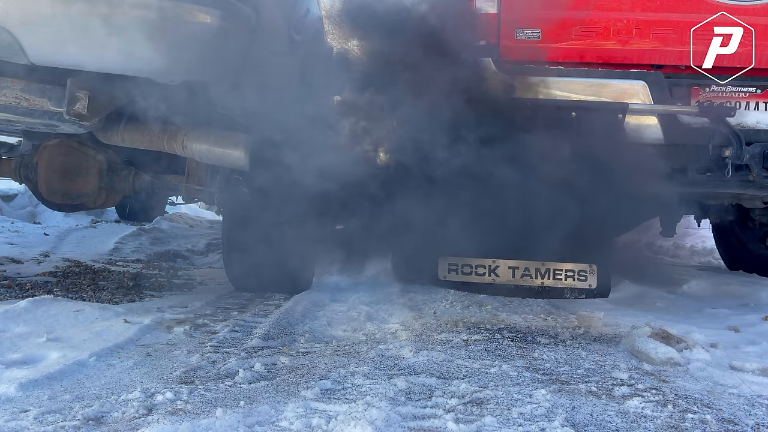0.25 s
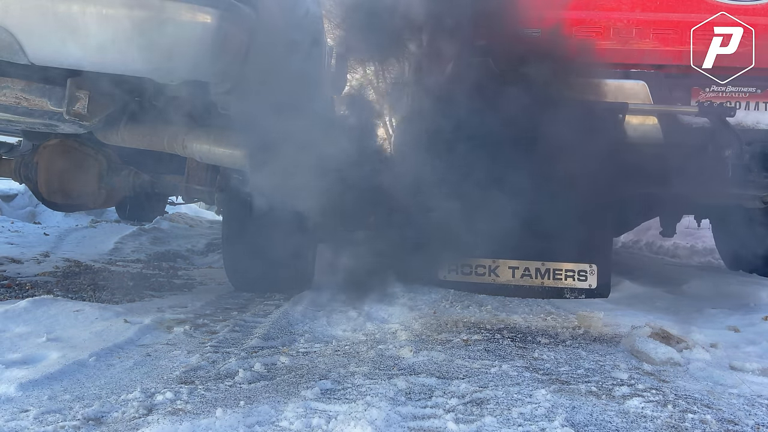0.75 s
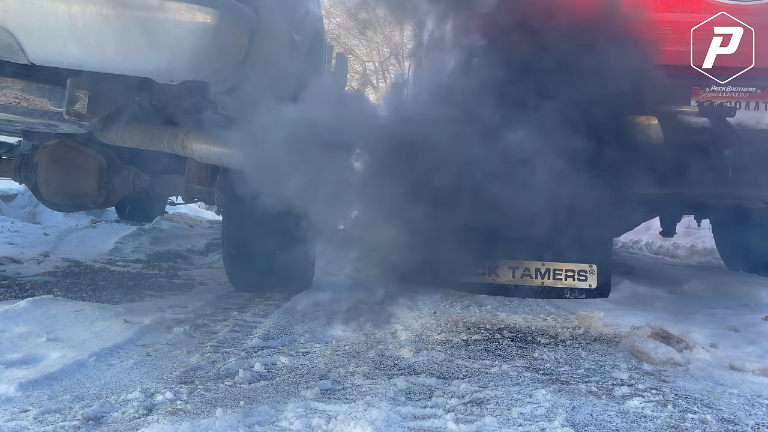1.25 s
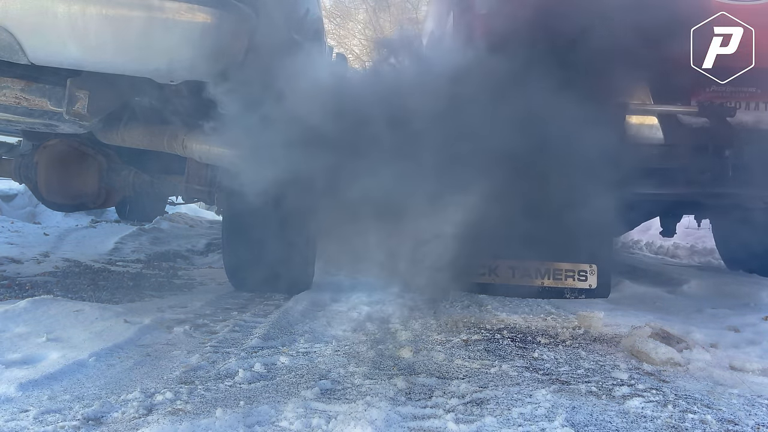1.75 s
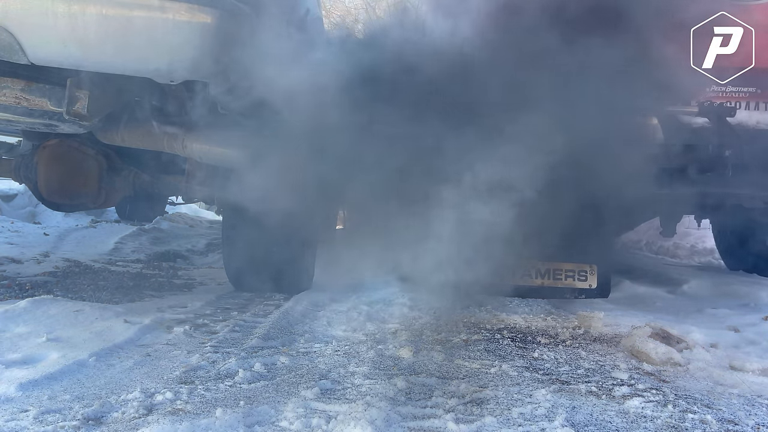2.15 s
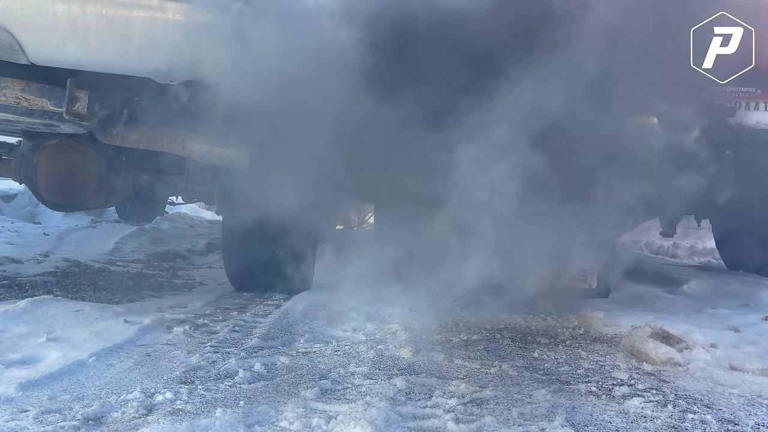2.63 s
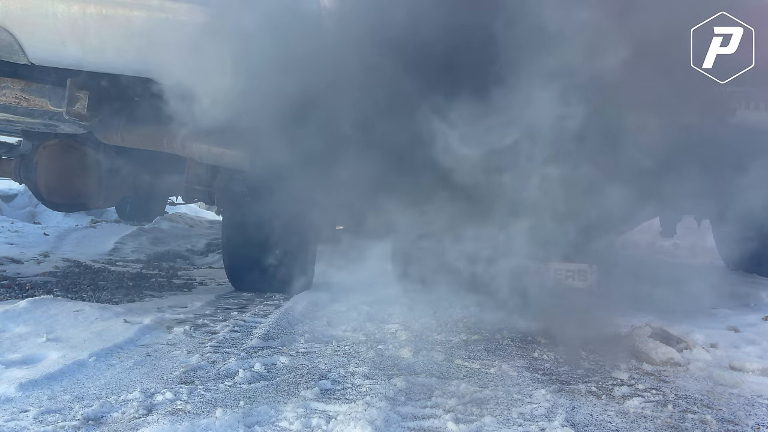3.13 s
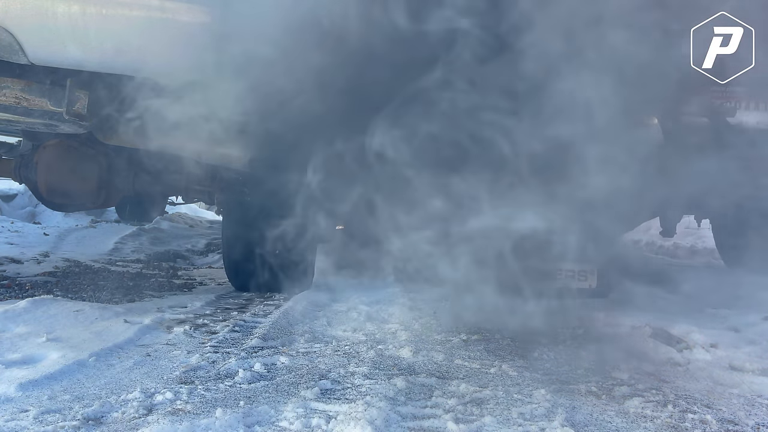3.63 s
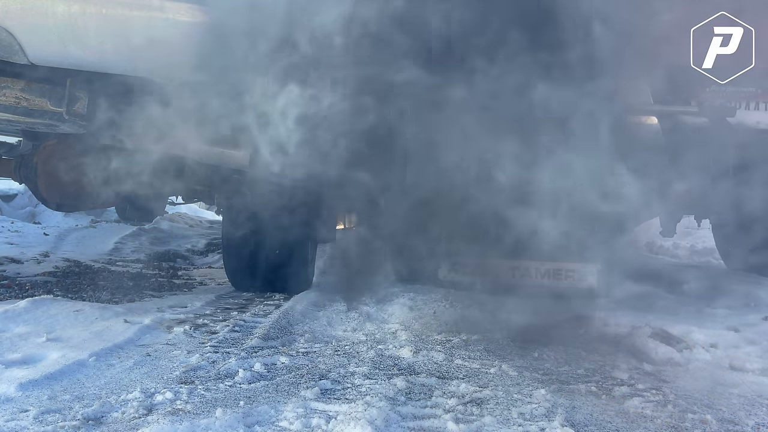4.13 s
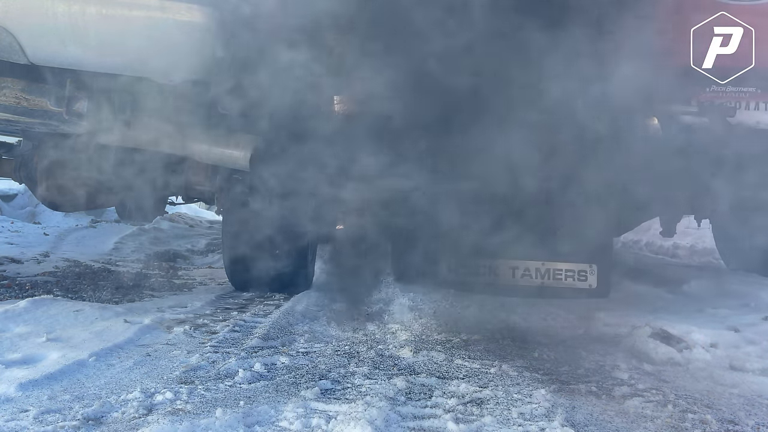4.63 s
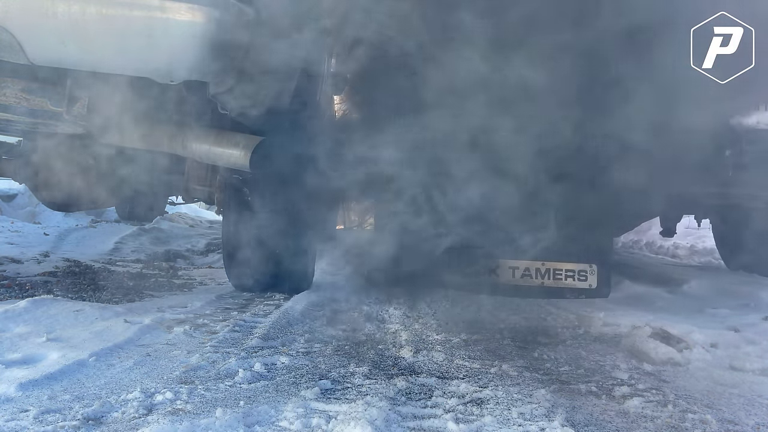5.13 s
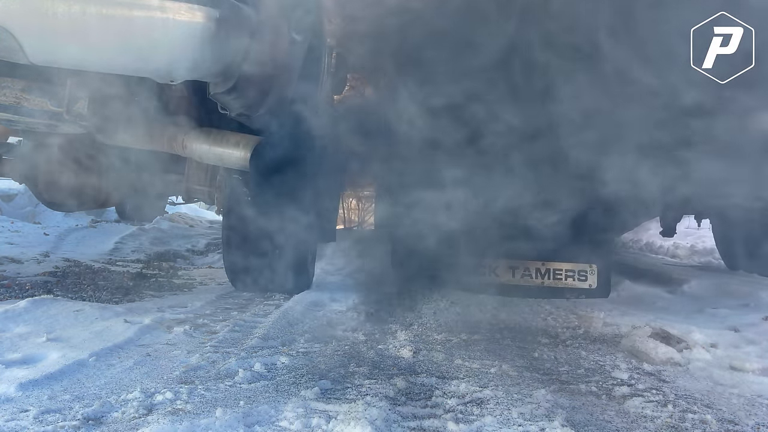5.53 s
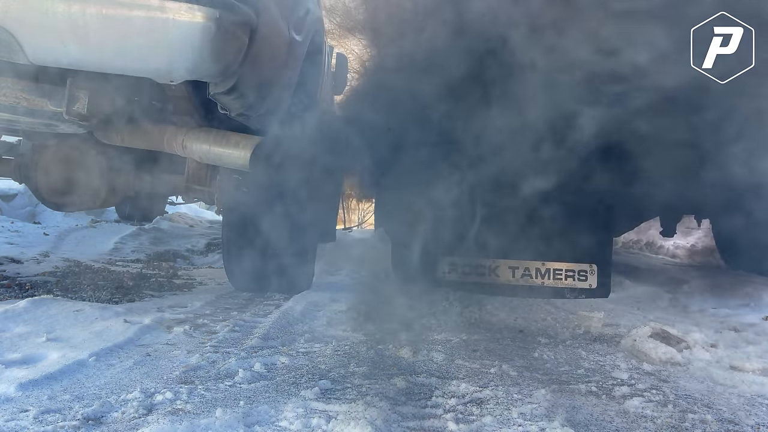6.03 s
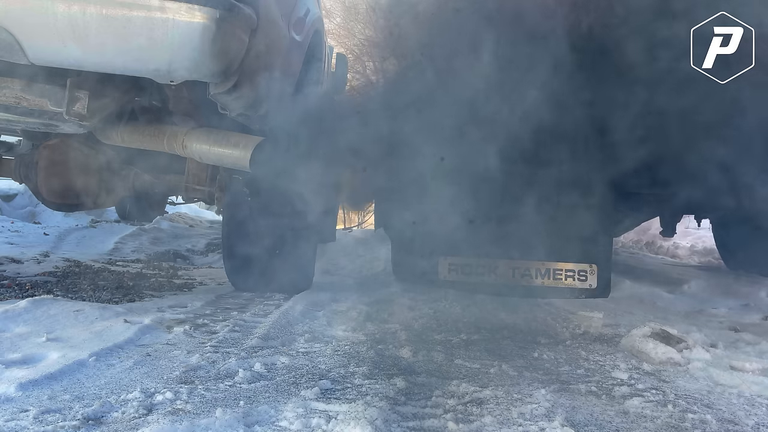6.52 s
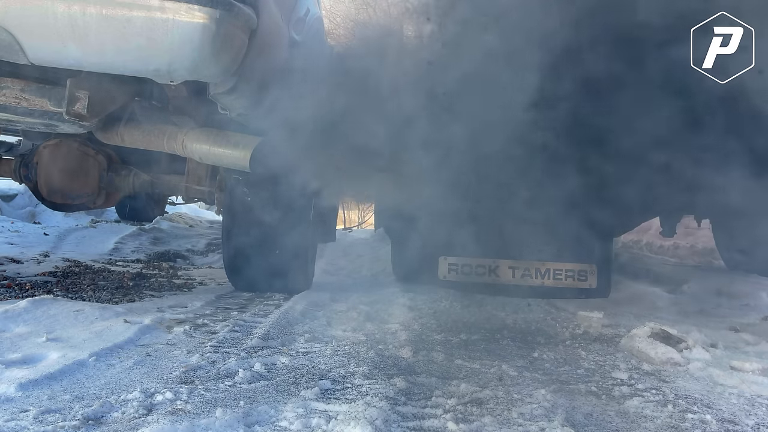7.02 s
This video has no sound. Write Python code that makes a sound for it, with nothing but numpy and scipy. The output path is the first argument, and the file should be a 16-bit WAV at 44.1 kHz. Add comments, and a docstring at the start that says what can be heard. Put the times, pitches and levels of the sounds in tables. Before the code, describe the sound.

Close at the exhaust, a big diesel idles in lumpy chugs, clattering and hissing, then climbs to a loud barking roar that softens into a rasp.

```python
"""Cold V8 diesel at the tailpipe

A pickup idles outdoors with a slow, uneven lope, then its engine revs up and the fuel eases off.
Each firing rings the exhaust pipe, drives a puff of gas out of it and sends a knock through the block.
The rocking engine rattles a ringing metal part and squeaks, until the lope smooths out with speed.
A fluttering hiss and a short whine ride on top; as the fuel eases, the clatter softens and a rasp comes in.
"""
import sys
import numpy as np
from scipy import signal
from scipy.fft import rfft, irfft
from scipy.io import wavfile
from scipy.ndimage import uniform_filter1d

SR = 44100
rng = np.random.default_rng(int(sys.argv[2]) if len(sys.argv) > 2 else 0)


def int16_out(signal):
    """Quantize to a 16-bit WAV file."""
    q = np.round(np.clip(np.atleast_2d(signal).T, -1, 1) * 32767)
    wavfile.write(sys.argv[1], SR, q.astype(np.int16))


N = 320607
TIME, FREQS = np.arange(N) / SR, np.fft.rfftfreq(N, 1 / SR)  # s, Hz

# firing rate of the whole engine: t/s, rate/Hz
FIRING_RATE = [(0.0, 23.37), (0.86, 22.6), (1.86, 24.29), (2.42, 26.5), (2.9, 27.42), (4.04, 34.69),
               (4.62, 42.17), (4.92, 51.43), (5.07, 52.08), (5.2, 47.29), (5.86, 65.6), (5.96, 69.76),
               (6.46, 84.45), (6.61, 82.69), (6.96, 73.6), (7.27, 68.98)]
# load on the engine: t/s, share/0-1
ENGINE_LOAD = [(3.3, 0), (4.0, 0.1), (4.25, 1), (4.9, 0.98)]
# one row a cylinder, in firing order: exhaust boom/dB, bark when loping/dB, bark when pulling/dB,
# knock when loping/dB, knock when pulling/dB, hiss/dB, squeak/dB, rattle/dB
CYLINDER_LEVELS = [(-9, -7, -2, -8, 7.5, 3, -16, -11.5), (-8.5, -4, -4, 1.5, 6, 9.5, -11, -6.5),
                   (-1, -7, 1, -2.5, 4.5, -9, -3.5, -1), (-31, -13, -3.5, -1, 0, -11, -1, -2.5),
                   (-3, -2, -0.5, -10, -2, -5, -10, -6.5), (-4, -4, -0.5, -6.5, 6, 10.5, -6, -1.5),
                   (-8.5, -3.5, -0.5, -3, -0.5, 9.5, -5.5, -5.5), (-1.5, -4, 4, 1.5, 6.5, 4, -12, -5.5)]
# spells of hard ignition in one cylinder: start t/s, end t/s, peak level before the block colours it/dB
HARD_IGNITION = [(0, .68, -20), (5.95, 6.38, -16.5)]
# the loudest metal squeaks: t/s, peak level before the resonance/dB
LOUD_SQUEAKS = [(3.1094, -16), (3.3764, -14.5), (3.63, -15.5), (4.3444, -19)]
# response of the exhaust pipe: f/Hz, level/dB
PIPE_RESPONSE = [(15, -28), (30, -58), (40, -12), (49, 4), (55, 8.5), (62, 0), (76, 2.5), (88, -5),
                 (104, 3.5), (128, -0.5), (160, -13), (210, -14.5), (255, -22), (700, -72.5)]
# colour of the gas leaving the pipe: f/Hz, level/dB
GAS_COLOUR = [(20, 4), (60, 7), (130, 9), (210, 0.5), (265, -4.5), (345, 2.5), (420, -6), (560, -7),
              (710, -9.5), (850, -31), (1100, -20), (2000, -14.5), (6000, -90)]
# colour of the combustion knock through the block: f/Hz, level/dB
BLOCK_COLOUR = [(100, -19.5), (400, 4), (700, -1.5), (900, -4.5), (1250, -3), (1900, 2.5), (2400, 4.5),
                (3000, 5.5), (3800, -7), (5000, -35), (6200, -25), (7200, -15), (9000, -14), (10000, -9.5),
                (10600, -45)]
# colour of the air and gas hiss: f/Hz, level/dB
HISS_COLOUR = [(800, 5), (3000, 8), (4200, 9), (5200, 4.5), (5750, 6.5), (6400, 4.5), (7250, -6), (8100, 2),
               (9400, 10.5), (10000, 2.5), (10500, -16), (11500, 6), (12200, -38)]
# colour of the rough gas hiss: f/Hz, level/dB
ROUGH_COLOUR = [(2400, -21), (3000, -20.5), (3400, -7), (3900, -7), (4170, -4), (4450, -11), (5200, -13.5),
                (7000, -21)]
# modes of the rattling metal: f/Hz, width/Hz, level/dB
METAL_MODES = [(1204, 13, -13), (1265, 17, -15), (1435, 17, -15.5), (1584, 8, -6), (1644, 12, 2),
               (1692, 17, -8), (1709, 17, -6.5), (1932, 15, -13), (2025, 22, -12), (2076, 27, -8),
               (2290, 14, -9), (2352, 18, -13), (2830, 22, -16)]
# lower tone of the whine, strongest near the top of the revs: t/s, f/Hz, level/dB
WHINE_TONE = [(6.1, 1396, -40), (6.25, 1410, -23.5), (6.4, 1377, -23.5), (6.55, 1330, -28),
              (6.7, 1384, -38)]
# share of power the two microphones have in common: f/Hz, share/0-1
MIC_LIKENESS = [(60, 0.47), (250, .99), (520, 0.89), (900, 0.11), (1200, 0.56), (1640, 0.95), (2060, 0.74),
                (2700, 0.018), (3250, 0.0079), (3800, 1), (5200, 0.078), (6700, 0.083), (8500, 0.44),
                (11000, 1)]
# level balance of the microphones: f/Hz, left minus right/dB
MIC_LEAN = [(60, -3), (200, 1.6), (400, 3.5), (700, 8.5), (1400, 5.5), (1700, 5), (2400, 0), (3600, -2.5),
            (4900, -2.5), (5650, -8), (6200, -3.5), (7300, -1.5), (8500, -2), (11000, 2)]
# phase between the microphones: f/Hz, lead of the left/rad
MIC_LEAD = [(0, -1), (300, 0.4), (750, 0.95), (1100, 1.1), (2200, -0.47), (4500, 1), (5500, 2),
            (6300, -3.1), (7100, 3.5), (8400, 6), (8900, 7.5), (10300, 9)]

# layer levels: idle/dB, per doubling of speed/dB, added while cold/dB, added once the fuel eases/dB
BOOM_DB = (47, -0.2, 0.5, -4)
BARK_DB = (31.46, 0.74, 3.3, 1.35)
RUSH_DB = (-28.5, 4, -.5, -2)
CLATTER_DB = (-34.5, 5, -2, -15)
RATTLE_DB = (-27, 2, -8, -6.5)
HISS_DB = (-41, 4.5, 2, -7)

BARK_LOAD_DB = 10  # the pulse fronts steepen under full load
RASP_DB, RASP_RISE_S = -35.5, 1.0
FAINT_SQUEAK_DB = -20  # offset on the squeak column
IDLE_HZ, START_TURN = 23, .14  # firings per second; firings already turned at the start
WARM_S = 0.98  # the cold-start changes in layer level have faded out by then
EASE_S, EASE_LENGTH_S = 6.046, 0.71  # the fuel eases off
STUMBLE_S, STUMBLE_WIDTH_S, STUMBLE_DB = 5.185, .016, -10  # combustion drops out briefly
UNEVEN, EVENING_POWER = 1.46, 1.34  # factor on the boom dB at idle; it falls as this power of speed
LOPE_END_HZ, LOPE_STEEPNESS = 41.6, 12  # the rocking is halved at this firing rate
HARD_CYLINDER = 4  # row of the cylinder table, counted from 0
BOOM_LIMIT_DB, LIMIT_DOUBLING_DB = -11, 1  # pipe damping sets in: level at idle, rise per doubling
POP_S, POP_SIZE = 4.143, 7  # a loud chuff as the engine takes up load; size against a normal puff
RATTLE_FADE_S = 0.022  # the swing of the loose part dies away between jolts
EDGE_HZ = 12100  # everything above this frequency is cut


def exhaust():
    """Unequal pressure pulses ring the pipe, and each drives a puff of turbulent gas out of its mouth."""
    unequal = UNEVEN / speed() ** EVENING_POWER
    times, at, (push_db, loping_db, pulling_db, *_) = firings(advance=.58, jitter=.0003)
    times = times + 0.0017  # travel down the pipe
    # no two firings burn alike, and their steep fronts vary more than their push
    luck = rng.standard_normal((len(at), 2))
    push = amp(push_db * unequal[at] + 1.0 * luck[:, 0])
    snap = amp(lope_blend(loping_db, pulling_db, at) + 1.7 * luck[:, 1])
    # the pipe's ringing is split at 88 Hz: boom below, bark above
    deep = 1 / (1 + (np.fft.rfftfreq(2 * N, 1 / SR) / 88) ** 16)
    push_ring = colour(strikes(times, push), PIPE_RESPONSE)[0]
    snap_ring = colour(strikes(times, snap), PIPE_RESPONSE)[0]
    boom = irfft(rfft(push_ring, 2 * N) * deep)[:N]
    bark = irfft(rfft(snap_ring, 2 * N) * (1 - deep))[:N]
    load_gain = amp(BARK_LOAD_DB * curves(ENGINE_LOAD)[0])
    throb = damped(level(*BOOM_DB) * boom) + level(*BARK_DB) * load_gain * bark
    puffs = noise() * (0.24 + bursts(times + 0.0034, snap, rise=0.0039, decay=0.04))
    pop = noise() * bursts([POP_S], np.array([POP_SIZE]), rise=.001, decay=.008)
    rush = level(*RUSH_DB) * steady(colour(puffs + pop, GAS_COLOUR))
    return np.array([throb, np.zeros(N)]) + rush


def damped(boom):
    """Losses at the mouth of the pipe keep its resonance from growing without bound."""
    power = abs(uniform_filter1d(boom ** 2, SR // 3))
    limit = amp(BOOM_LIMIT_DB + LIMIT_DOUBLING_DB * np.log2(speed()))
    return boom / (1 + (power / limit ** 2) ** 2) ** (1 / 4)


def knock():
    """Each ignition is a short gritty crash in the block; one cylinder has spells of extra hard ones."""
    times, at, (_, _, _, loping_db, pulling_db, *_) = firings(advance=.17, jitter=.0008)
    sizes = amp(lope_blend(loping_db, pulling_db, at) + 1.0 * rng.standard_normal(len(at)))
    crashes = grit(depth_db=1.3, grain=.0008) * (.22 + bursts(times, sizes, rise=.008, decay=.0075))
    clatter = level(*CLATTER_DB) * stumble() * steady(colour(crashes, BLOCK_COLOUR))
    # firings are numbered from 1, so this picks the hard cylinder once a cycle
    hard_times = times[HARD_CYLINDER - 1::len(CYLINDER_LEVELS)]
    peaks = sum(amp(db) * (hard_times > start) * (hard_times < end) for start, end, db in HARD_IGNITION)
    hard = grit(depth_db=1.1, grain=.0008) * bursts(hard_times, peaks, rise=.008, decay=.011)
    return clatter + colour(hard, BLOCK_COLOUR)


def rattle():
    """Jolts of the rocking engine, each with a rebound, set a metal part chattering in its own modes."""
    times, at, (*_, jolt_db) = firings(advance=0.3394, jitter=0.0029)
    sizes = amp(jolt_db * lope()[at] + 1.1 * rng.standard_normal(len(at)))
    first = bursts(times, sizes, rise=0.0002, decay=0.021)
    rebound = bursts(times + 0.01964, 0.55 * sizes, rise=0.00059, decay=0.0054)
    jolts = .09 + first + rebound
    chatter = noise() * jolts
    ring = sum(amp(db) * resonate(chatter, hz, width) for hz, width, db in METAL_MODES)
    # jolt energy adds up and leaks away
    swing = np.sqrt(signal.lfilter([1], [1, -np.exp(-1 / (RATTLE_FADE_S * SR))], jolts ** 2))
    return level(*RATTLE_DB) * steady(steady(ring, spans=(.07, .04)) * swing)


def hiss():
    """Fine spitting hiss of air and gas that flutters with the firings."""
    times, at, (*_, spit_db, _, _) = firings(advance=0.14, jitter=0.001)
    spits = amp(spit_db + 2 * rng.standard_normal(len(at)))
    flutter = 2.16 + bursts(times, spits, rise=0.00083, decay=0.02)
    spitting = colour(grit(depth_db=2.5, grain=0.0042) * flutter, HISS_COLOUR)
    return level(*HISS_DB) * stumble() * steady(spitting)


def rasp():
    """A rough hiss of gas, pulsed by the stronger cylinders, that comes in as the fuel eases."""
    times, _, (push_db, *_) = firings(advance=0.33, jitter=0.0084)
    pulses = .14 + bursts(times, amp(push_db), rise=.002, decay=.009)
    puffs = grit(depth_db=2, grain=.001) * pulses
    return amp(RASP_DB) * ramp(EASE_S, RASP_RISE_S) * steady(colour(puffs, ROUGH_COLOUR))


def squeak():
    """Chirps of metal rubbing as the engine rocks: faint at every jolt, now and then louder."""
    times, at, (*_, squeak_db, _) = firings(advance=0.43, jitter=0.0053)
    s, peak_db = np.transpose(LOUD_SQUEAKS)
    faint = bursts(times, amp(FAINT_SQUEAK_DB + squeak_db) * lope()[at], rise=.004, decay=.012)
    loud = bursts(s, amp(peak_db), rise=.008, decay=.014)
    rub = noise() * (faint + loud)
    return resonate(resonate(rub, hz=5700, width=300), hz=5700, width=300)


def whine():
    """Two faint tones, wavering in level, that sag in pitch around the top of the revs."""
    hz, db = curves(WHINE_TONE)
    turns = np.cumsum(hz) / SR
    waver = signal.sosfilt(signal.butter(2, 18, fs=SR, output="sos"), noise())
    tones = np.sin(2 * np.pi * turns) + 0.52 * np.sin(2 * np.pi * 1.068 * turns)
    return amp(db) * tones * (0.34 + 0.08 * waver / waver.std())


def firings(advance, jitter):
    """Times (s), sample indices and cylinder columns of all firings, early by a share of the interval."""
    turns = START_TURN + np.cumsum(curves(FIRING_RATE)[0]) / SR
    number = np.arange(1, int(turns[-1]) + 1)
    times = np.interp(number - advance, turns, TIME) + jitter * rng.standard_normal(len(number))
    at = np.clip(times * SR, 0, N - 1).astype(int)
    return times, at, np.array(CYLINDER_LEVELS)[number % len(CYLINDER_LEVELS)].T


def speed():
    """Engine speed as a multiple of idle."""
    return curves(FIRING_RATE)[0] / IDLE_HZ


def lope():
    """How much the engine rocks on its mounts: near 1 at idle, near 0 at speed."""
    return 1 / (1 + (speed() * IDLE_HZ / LOPE_END_HZ) ** LOPE_STEEPNESS)


def lope_blend(loping_db, pulling_db, at):
    """Slides each firing's dB from its loping to its pulling value as the rocking stops."""
    return pulling_db + lope()[at] * (loping_db - pulling_db)


def level(idle_db, doubling_db, cold_db, eased_db):
    """A layer's gain from engine speed, cold start and easing of the fuel."""
    cold = cold_db * (1 - ramp(0, WARM_S))
    eased = eased_db * ramp(EASE_S, EASE_LENGTH_S)
    return amp(idle_db + doubling_db * np.log2(speed()) + cold + eased)


def stumble():
    """Gain of the clatter and hiss, dipping once as combustion drops out briefly."""
    return amp(STUMBLE_DB * np.exp(-((TIME - STUMBLE_S) / STUMBLE_WIDTH_S) ** 2))


def ramp(start, length):
    """Rises from 0 to 1 over the given seconds."""
    return np.clip((TIME - start) / length, 0, 1)


def amp(db):
    """Decibels to gain."""
    return 10 ** (np.asarray(db) / 20)


def curves(table):
    """Each column of a timed table, sample by sample."""
    s, *columns = np.transpose(table)
    return [np.interp(TIME, s, c) for c in columns]


def read(points, hz):
    """A spectrum table on a log-frequency axis."""
    f, value = np.transpose(points)
    return np.interp(np.log(hz + 1), np.log(f + 1), value)


def steady(x, spans=(.35, .17)):
    """Evens the rms to about 1 over the given seconds, keeping the faster throb inside them."""
    power = np.atleast_2d(x ** 2).mean(0)
    for seconds in spans:
        power = uniform_filter1d(power, int(seconds * SR))
    return x / np.sqrt(abs(power) + 1e-20)


def colour(x, points, size=16384):
    """Causal minimum-phase filter with the given spectrum, so that it rings after each blow."""
    cepstrum = np.fft.irfft(np.log(amp(read(points, np.fft.rfftfreq(size, 1 / SR)))))
    # fold the cepstrum onto positive time
    cepstrum[1:size // 2] *= 2
    cepstrum[size // 2 + 1:] = 0
    taps = irfft(np.exp(rfft(cepstrum)))[:size // 2]
    return signal.oaconvolve(np.atleast_2d(x), taps[None], axes=1)[:, :N]


def resonate(x, hz, width):
    """One mode with a peak gain of 1."""
    return signal.lfilter(*signal.iirpeak(hz, hz / width, fs=SR), x)


def noise():
    """Two unrelated white noises."""
    return rng.standard_normal((2, N))


def grit(depth_db, grain):
    """Noise whose level wanders at random from one grain (s) to the next."""
    knots = np.arange(0, TIME[-1] + grain, grain)
    wander = np.interp(TIME, knots, rng.standard_normal(N)[:len(knots)])
    return noise() * amp(depth_db * wander)


def strikes(times, sizes):
    """A train of single-sample clicks."""
    train, at = np.zeros(N), np.round(np.asarray(times) * SR).astype(int)
    inside = (at >= 0) & (at < N)
    np.add.at(train, at[inside], sizes[inside])
    return train


def bursts(times, sizes, rise, decay):
    """An envelope that swells and dies (s) after each time."""
    t = TIME[:SR // 4]
    shape = (1 - np.exp(-t / rise)) * np.exp(-t / decay)
    return signal.oaconvolve(strikes(times, sizes), shape / shape.max())[:N]


def microphones(pair):
    """Two microphones whose likeness, balance and phase depend on frequency."""
    a, b = rfft(pair)
    same = np.clip(read(MIC_LIKENESS, FREQS), 0, 1)
    lean, lead = amp(read(MIC_LEAN, FREQS) / 2), read(MIC_LEAD, FREQS)
    left = a * lean
    right = (np.sqrt(same) * a + np.sqrt(1 - same) * b) * np.exp(-1j * lead) / lean
    return irfft(np.array([left, right]), N)


def scene():
    """All parts of the truck, heard by the two microphones without any room."""
    return microphones(exhaust() + knock() + rattle() + hiss() + squeak() + rasp() + whine())


def record(dry):
    """Rounds off the highest peaks, then cuts everything above the band edge."""
    rounded = dry / (1 + (dry / .95) ** 8) ** (1 / 8)
    band = signal.firwin(511, EDGE_HZ, window=("kaiser", 9), fs=SR)
    return signal.oaconvolve(rounded, band[None], "same")


dry = scene()
out = record(dry)
int16_out(out)
```